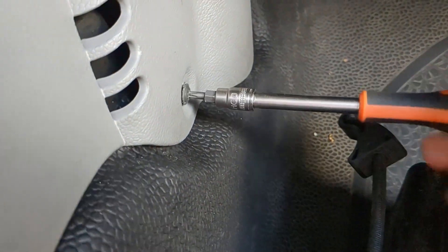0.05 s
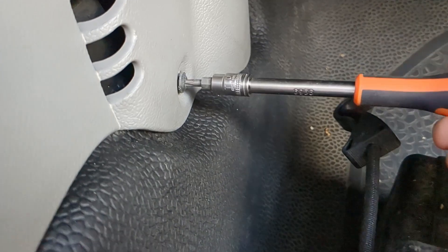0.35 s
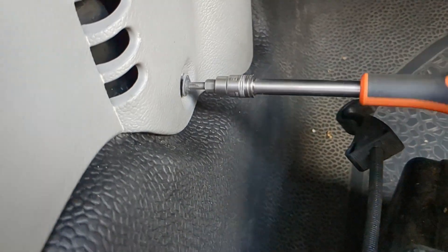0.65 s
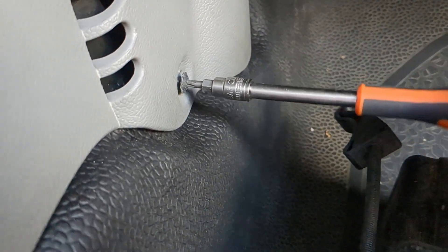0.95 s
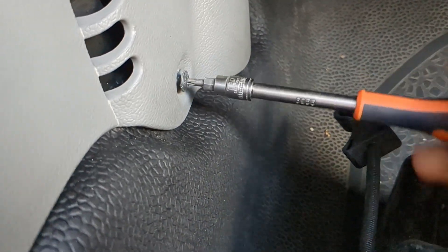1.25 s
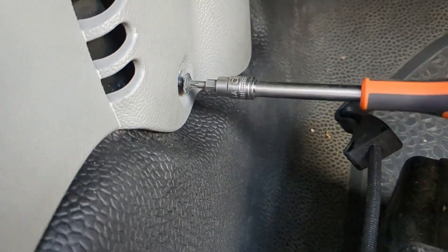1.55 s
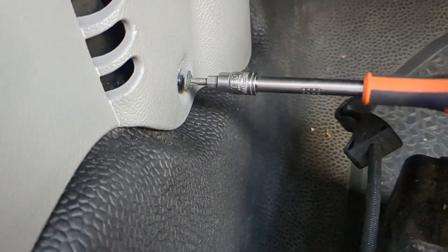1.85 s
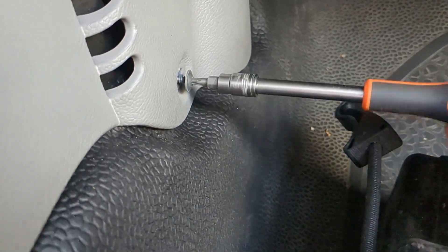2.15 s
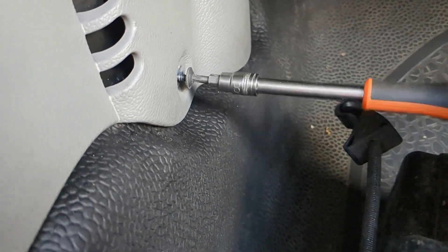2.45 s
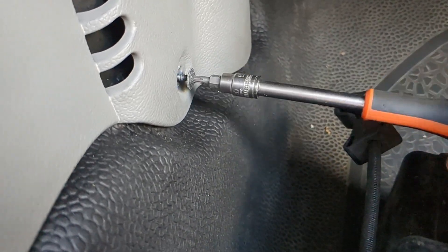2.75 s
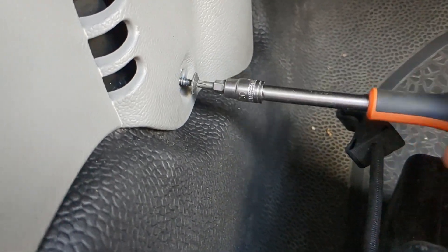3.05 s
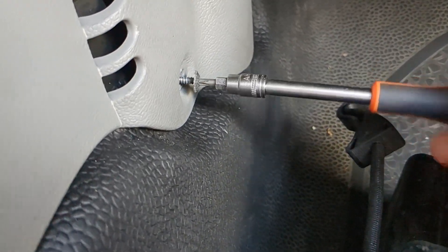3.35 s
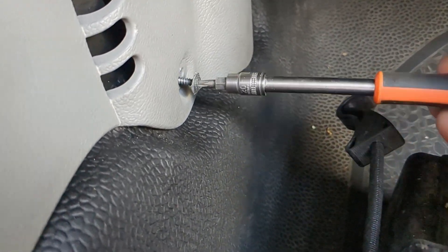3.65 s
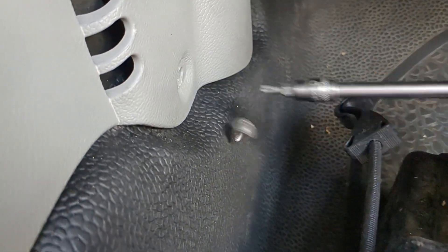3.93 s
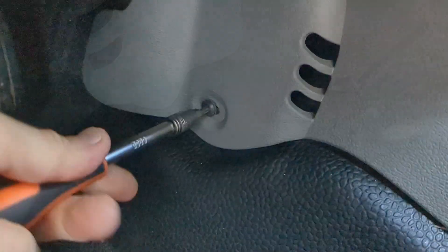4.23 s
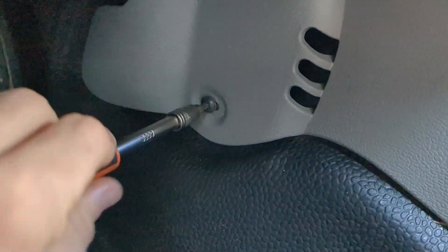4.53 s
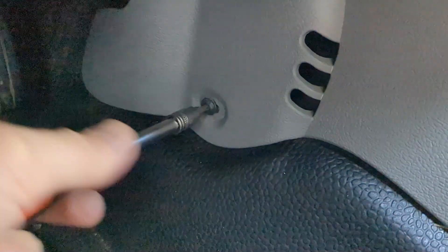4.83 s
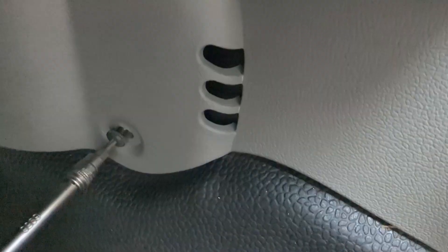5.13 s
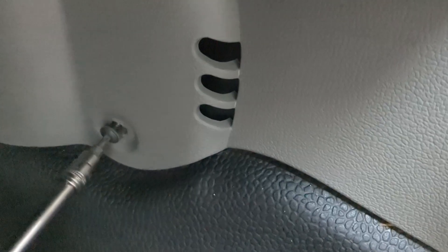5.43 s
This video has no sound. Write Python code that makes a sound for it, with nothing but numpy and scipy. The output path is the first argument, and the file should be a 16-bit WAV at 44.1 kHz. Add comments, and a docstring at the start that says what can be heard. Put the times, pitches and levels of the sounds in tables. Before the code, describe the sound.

Light knocks and rasps of unscrewing a plastic panel inside a car, until the screw falls and bounces loudly over a low rumble.

```python
"""A car's footwell, a stereo pair close to a plastic trim panel, the work off to the left.
A screwdriver backs out a small screw: the bit knocks in the head and bends the panel, the thread
sticks, slips and rasps in the plastic, and fingers hiss round the handle. The screw drops to the floor
and bounces; work goes on more quietly at a second screw, almost straight ahead.
Behind it lie a low cabin rumble, a distant engine pulling away and, at the end, a faint hiss."""
import sys
import numpy as np
from scipy import signal
from scipy.fft import rfft, irfft
from scipy.io import wavfile
from scipy.ndimage import uniform_filter1d

SR = 44100
rng = np.random.default_rng(int(sys.argv[2]) if len(sys.argv) > 2 else 0)


def wav_out(sig):
    """Save sig, one row per channel (or a flat mono array), as 16-bit PCM at SR to the path in sys.argv[1]."""
    wavfile.write(sys.argv[1], SR, np.round(np.clip(np.atleast_2d(sig).T, -1, 1) * 32767).astype(np.int16))


N = 246386
HZ, AGE = np.fft.rfftfreq(8192, 1 / SR), np.arange(8192) / SR  # axes of every response [Hz], [s]

# Levels are relative within each table; spectra give level per hertz.
# rumble in the cabin (frequency [Hz], level [dB])
RUMBLE_SPECTRUM = [(20, -29), (40, -26.5), (60, -1.5), (85, -15.5), (130, -16.5), (250, -31), (400, -29.5),
                   (700, -35), (1050, -45), (7000, -59.5), (16000, -54.5)]
# the distant engine (time [s], pitch [Hz], level [dB])
ENGINE_CURVE = [(4.1, 69.7, -74), (4.3, 74.65, -46), (5.0, 88.9, -54), (5.58, 98.1, -56.5)]
# how long sound lingers in the footwell (frequency [Hz], t60 [s])
CABIN_DECAY = [(100, 0.29), (400, 0.11), (3500, 0.12), (8000, 0.11), (16000, 0.009)]
# the left microphone is the louder (frequency [Hz], left minus right [dB])
MIC_BALANCE = [(150, 3), (380, 7.5), (1300, 6.5), (2400, 9.5), (4400, 3), (15000, 3)]
# twists of the wrist (start [s], length [s], effort [dB], hand hiss [dB], bite of the bit [dB])
TWISTS = [(0.18, 0.14, -52, -66, -36), (0.39, 0.07, -46, -55.5, -44), (0.582, 0.24, -51, -59, -49),
          (0.997, 0.19, -49.5, -59, -43.5), (1.389, 0.16, -50.5, -58.5, -34),
          (1.74, 0.18, -47, -57.5, -38.5), (2.106, 0.15, -46.5, -54.5, -33.5), (2.452, 0.11, -42, -58, -46),
          (2.793, 0.12, -45, -63, -35), (3.107, 0.12, -41.5, -58.5, -61), (3.464, 0.12, -45, -59, -59),
          (3.754, 0.16, -59.5, -80, -59)]
# fingers slide back for a new grip (peak time [s], rise [s], level [dB])
GRIP_SLIDES = [(0.06, 0.085, -61), (0.36, 0.038, -51), (0.94, 0.068, -72), (1.234, 0.022, -68.5),
               (1.311, 0.024, -73), (1.663, 0.071, -56.5), (2.027, 0.075, -57.5), (2.354, 0.087, -58),
               (2.606, 0.014, -65.5), (2.735, 0.036, -68), (3.28, 0.034, -73.5), (3.388, 0.075, -58.5),
               (3.64, 0.034, -68.5), (3.773, 0.027, -64.5), (4.035, 0.046, -71.5), (4.264, 0.078, -63.5),
               (4.35, 0.075, -58), (4.43, 0.073, -69), (4.541, 0.035, -64.5), (4.802, 0.031, -52.5),
               (4.894, 0.065, -56.5), (4.972, 0.023, -64), (5.039, 0.033, -59.5), (5.205, 0.043, -62.5),
               (5.389, 0.025, -59), (5.49, 0.057, -64)]
# skin on the handle (frequency [Hz], level [dB])
SKIN_SPECTRUM = [(300, -16.5), (900, 2), (1500, 3), (3100, 1), (5000, -8.5), (6800, -4), (8000, -9),
                 (10000, 1), (12000, 3.5), (14000, -8), (16000, -0.5)]
# the thread rubbing in its hole (frequency [Hz], level [dB])
THREAD_SPECTRUM = [(60, -9.5), (125, 4), (250, -0.5), (900, 5), (1600, -4), (3200, 2), (7000, 4.5),
                   (15000, -18)]
# rasps of the loosened thread (start [s], peak [s], end [s], level [dB])
RASPS = [(2.47, 2.545, 2.578, -49), (2.805, 2.844, 2.94, -52), (3.125, 3.187, 3.225, -59),
         (3.48, 3.572, 3.592, -54)]
# broad colour of the rasp (frequency [Hz], level [dB])
RASP_SPECTRUM = [(500, -20), (1400, 0), (4800, -2), (7000, -12.5), (10000, -33)]
# resonances of the screw (frequency [Hz], width [Hz], gain [dB])
SCREW_MODES = [(2330, 380, 11), (3210, 570, 13.3), (4520, 210, 8.7), (6530, 610, 14.6)]
# broad response of the trim panel (frequency [Hz], gain [dB])
TRIM_RESPONSE = [(40, -26), (120, 2.5), (260, -9.5), (500, -8), (1000, -1.5), (1700, -8.5), (3000, -12),
                 (5000, -28.5), (7000, -24), (8200, -35), (11000, -21.5), (16000, -46.5)]
# its resonances before the tool damps them (frequency [Hz], width [Hz], gain [dB])
TRIM_MODES = [(121.4, 17, 12.5), (164.7, 38.5, 16.5), (366.7, 44.7, 19.5), (421, 26, 13.5), (645, 86, 6),
              (1336, 190, 3), (1474, 47, 9.5), (2236, 140, 4), (3210, 280, 4), (4190, 150, 9)]
# the band where the second panel hardly radiates (frequency [Hz], width [Hz], gain [dB])
SECOND_TRIM_DIP = [(955, 720, -19)]
# the bit slips in the head (time [s], body level [dB], hardness [dB], metal tick against body [dB])
BIT_SLIPS = [(0.057, -28, 18.5, -15), (0.075, -34.5, 6.5, -28), (0.198, -33, 8, -32.5),
             (0.273, -42.5, -11, -32), (0.361, -27, 6, -25), (0.444, -43.5, -11, -30),
             (0.833, -30.5, 9, -26), (0.87, -40.5, 0.5, -25), (1.017, -40.5, -10, -51),
             (1.176, -36, -0.5, -40), (1.196, -41, 5.5, -34), (1.519, -47, -6, -30),
             (1.586, -36, -1.5, -38), (1.765, -40.5, -6, -48), (1.879, -38, -0.5, -32),
             (2.229, -28, -1, -18.5), (2.293, -32.5, 4.5, -18), (2.52, -35.5, 0, -36),
             (2.551, -36, -2, -35), (2.62, -45, -4, -40), (2.973, -28, -4.5, -41), (3.201, -32, -31, -22),
             (3.567, -51, 5.5, -0.5), (3.669, -43, -11, -44), (3.902, -35, 8.5, -18),
             (3.932, -31, 8.5, -31), (4.314, -39.5, -10, -27), (4.337, -42.5, -15, -25),
             (4.545, -43.5, -14.5, -27), (4.642, -35.5, -2.5, -18), (4.709, -51.5, -5.5, -29.5),
             (4.813, -44.5, -13, -15), (4.867, -41, -8, -36), (4.893, -46.5, -29, -32),
             (4.982, -50, -24, -31), (5.151, -40.5, 6.5, -17.5)]
# the screw lands and bounces (time [s], level [dB], low thud [dB], ring [dB])
BOUNCES = [(4.1092, -8, -9, -11), (4.1144, -17, 6.5, -27), (4.1256, -11, -17.5, -3.5),
           (4.2442, -18, 7, -24), (4.29, -25, 2, -28.5)]
# the crack of a landing (frequency [Hz], level [dB])
LANDING_SPECTRUM = [(40, -27.5), (130, 7), (300, -0.5), (800, 3), (1500, -1), (2200, 0.5), (3300, -6.5),
                    (4400, -21.5), (7500, -30), (12000, -24.5), (16000, -54.5)]
# ring of what the screw strikes (frequency [Hz], level [dB], t60 [s])
FLOOR_RING = [(510, 2, 0.12), (797, -4.5, 0.17), (1170, -6.5, .14), (1258, 3, 0.15), (1340, -7.5, 0.13),
              (1488, -3, 0.11), (1690, -15, 0.13), (2200, -18.5, 0.18), (2410, -12, .17), (2552, -16, 0.19),
              (3540, -17, 0.23)]

SECOND_SCREW_S = 4.3
PITCH_SPREAD = .04  # each contact loads a part differently and shifts its resonances


def amp(db):
    """Decibels to gain."""
    return 10 ** (np.asarray(db) / 20)


def evened(x):
    """Scales to rms 1."""
    return x / np.sqrt(np.mean(x ** 2) + 1e-20)


def read(points, hz=HZ):
    """Reads a spectrum table on a log-frequency axis."""
    f, value = np.transpose(points)
    return np.interp(np.log(hz + 1), np.log(f + 1), value)


def follow(rows, column=1):
    """Reads one column of a curve at every sample."""
    rows = np.array(rows)
    return np.interp(np.arange(N) / SR, rows[:, 0], rows[:, column])


def add(mix, s, sound):
    """Adds a stereo sound at time s."""
    part = mix[:, max(round(s * SR), 0):][:, :sound.shape[1]]
    part += sound[:, :part.shape[1]]


def causal(db):
    """The response of a passive body with this gain: it rings only after the blow."""
    cepstrum = irfft(np.log(amp(db)))
    return np.exp(rfft(cepstrum * (1 + np.sign(np.fft.fftfreq(len(AGE))))))


def ringing(response):
    """The impulse response of a frequency response, faded at its far end."""
    return np.atleast_2d(irfft(response)) * np.minimum(1, 2 - 2 * AGE / AGE[-1])


def through(x, response):
    """Passes a sound through a frequency response."""
    return signal.fftconvolve(x, ringing(response), axes=1)[:, :N]


def resonances_db(modes, pitch=1, damping=1):
    """Gain of a set of resonances, shifted by pitch and widened by damping."""
    peaks = sum((amp(db) - 1) / (1 + (2 * (HZ - hz * pitch) / (width * damping)) ** 2)
                for hz, width, db in modes)
    return 20 * np.log10(np.maximum(1 + peaks, 1e-3))


def sides(lean=1):
    """Gains at the left and right microphones; lean 0 is straight ahead, 1 off to the left."""
    return amp(lean * np.outer([.5, -.5], read(MIC_BALANCE)))


def scatter(t60, wide_hz=450):
    """Dense reflections of energy 1, alike at both microphones in the bass; t60 is a table by frequency."""
    hz, t, noise = signal.stft(rng.standard_normal((2, len(AGE))), SR, nperseg=128)
    apart = (hz ** 2 / (hz ** 2 + wide_hz ** 2))[:, None]
    pair = np.array([noise[0], np.sqrt(1 - apart ** 2) * noise[0] + apart * noise[1]])
    tail = signal.istft(pair * amp(-60 * t / read(t60, hz)[:, None]), SR, nperseg=128)[1]
    onset = 1 - np.exp(-AGE / 0.0014)
    return rfft(evened(tail * onset) / np.sqrt(len(AGE)))


def footwell(near_db, tail_db, near_t60, s=0, lag_s=.00023):
    """Path to the microphones at time s: direct sound, left first, then close walls, then the cabin."""
    lean = 0.2 if s > SECOND_SCREW_S else 1
    direct = np.exp(-2j * np.pi * np.outer([0, round(lean * lag_s * SR) / SR], HZ))
    near = scatter([(300, near_t60), (8000, near_t60 / 2)])
    return sides(lean) * (direct + amp(near_db) * near + amp(tail_db) * scatter(CABIN_DECAY))


def far_hiss(level_db=-72, centre_hz=1700):
    """A faint midrange hiss comes up at the end."""
    hiss = signal.lfilter(*signal.iirpeak(centre_hz, 2, SR), rng.standard_normal((2, N)))
    return amp(level_db) * evened(hiss) * follow([(5.1, 0), (5.3, 1)])


def far_engine():
    """An engine pulls away in the distance: one low, rising tone, the same at both microphones."""
    phase = 2 * np.pi * np.cumsum(follow(ENGINE_CURVE)) / SR
    return amp(follow(ENGINE_CURVE, column=2)) * np.sqrt(2) * np.sin(phase)


def cabin_rumble(level_db=-52, late_bass_db=3, wide_hz=300):
    """Rumble all round; its bass is alike at both microphones and louder at the second screw."""
    common, apart = rng.standard_normal((1, N)), rng.standard_normal((2, N))
    colour, width = causal(read(RUMBLE_SPECTRUM)), HZ / (HZ + wide_hz)
    rumble = evened(through(common, colour * np.sqrt(1 - width ** 2)) + through(apart, colour * width))
    bass = signal.sosfilt(signal.butter(1, wide_hz, fs=SR, output="sos"), rumble)
    swell = amp(follow([(4.1, 0), (4.25, late_bass_db)])) - 1
    return amp(level_db) * (rumble + swell * bass)


def friction(stroke, per_s, spread_db, smooth, judder_db, drift_db=0.5):
    """Tiny slips of uneven size over a smooth rub, under a hand that judders and drifts in pressure."""
    n = len(stroke)
    size = amp(spread_db * np.minimum(rng.exponential(1, n), 4)) * rng.choice([-1, 1], n)
    drive = evened(size * (rng.random(n) < per_s / SR)) + smooth * rng.standard_normal((2, n))
    judder = evened(uniform_filter1d(rng.standard_normal(n), size=300, mode="wrap"))
    drift = evened(uniform_filter1d(rng.standard_normal(n), size=1300, mode="wrap"))
    return evened(drive * amp(judder_db * judder + drift_db * drift)) * stroke


def rub(s, drive, colour_db, band_hz, grip_db=1.6):
    """Friction at the microphones, coloured by what it shakes and by the grip; band_hz sets the gain."""
    path = footwell(near_db=-5, tail_db=-9, near_t60=.03, s=s)
    colour_db = colour_db + grip_db * evened(uniform_filter1d(rng.standard_normal(len(HZ)), size=110))
    inside = (HZ > band_hz[0]) & (HZ < band_hz[1])
    band_gain = np.sqrt(np.mean((amp(colour_db) * inside) ** 2))
    return through(drive, causal(colour_db) * path / band_gain)


def twist(length, rise_s=0.086, fall_s=0.031, ease_db=-10):
    """Torque through one twist: it builds, eases and is let go quickly."""
    t = np.arange(0, length + fall_s / 2, 1 / SR)
    ramp = np.clip(np.minimum(t / rise_s, (t[-1] - t) / fall_s), 0, 1)
    return np.sin(np.pi / 2 * ramp) ** 2 * amp(ease_db * (t / length - .5))


def slide(length, start_db=-16.5, end_db=-41, roundness=1.7):
    """Speed of sliding skin, one length either side of its peak: it gathers slowly and stops fast."""
    u = np.linspace(-1, 1, round(2 * max(length, .01) * SR))
    return amp(np.where(u < 0, start_db * abs(u) ** roundness, end_db * u ** 2))


def fingers(regrip_db=1, twist_dull_db=1, regrip_dull_db=4, dull_hz=5000, lighten_db_per_s=2.37):
    """Skin hisses round the handle at each twist and new grip; its dull rub fades as the grip lightens."""
    out = np.zeros((2, N))
    strokes = []
    for s, length, _, hiss_db, _ in TWISTS:
        torque = twist(length)
        speed = slide(0.73 * length)[:len(torque)]  # peaks late in the twist
        strokes.append((s, speed * np.sqrt(torque), hiss_db, twist_dull_db))
    strokes += [(s - rise, slide(rise), db + regrip_db, regrip_dull_db) for s, rise, db in GRIP_SLIDES]
    for s, stroke, db, dull_db in strokes:
        colour = read(SKIN_SPECTRUM) + (dull_db - lighten_db_per_s * s) / (1 + (HZ / dull_hz) ** 4)
        drive = friction(stroke, per_s=1300, spread_db=4, smooth=.65, judder_db=1.8)
        add(out, s, amp(db) * rub(s, drive, colour, band_hz=(9000, 15000)))
    return out


def panel_db(s, second_pitch=1.124, tool_damping=1.3):
    """Gain of the panel at time s, damped by the pressing tool; the second is higher and hollower."""
    second = s > SECOND_SCREW_S
    pitch = (second_pitch if second else 1) * (1 + PITCH_SPREAD * rng.uniform(-0.97, 1))
    hollow = second * resonances_db(SECOND_TRIM_DIP)
    return read(TRIM_RESPONSE) + resonances_db(TRIM_MODES, pitch, tool_damping) + hollow


def thread(level_db=-4.5, groan_db=-3, groan_hz=190):
    """At each twist the thread sticks and slips in the plastic and shakes the panel."""
    out = np.zeros((2, N))
    for s, length, db, _, _ in TWISTS:
        colour = panel_db(s) + read(THREAD_SPECTRUM) + groan_db / (1 + (HZ / groan_hz) ** 4)
        drive = friction(twist(length), per_s=500, spread_db=3, smooth=.5, judder_db=2.2)
        add(out, s, amp(db + level_db) * rub(s, drive, colour, band_hz=(300, 1000)))
    return out


def rasp():
    """The loose screw grinds in its hole: sharp grains build up, ring the screw and break off."""
    out = np.zeros((2, N))
    for start, peak, end, db in RASPS:
        stroke = np.interp(np.arange(start, end, 1 / SR), [start, peak, end], [0, 1, 0]) ** 2.55
        drive = friction(stroke, per_s=700, spread_db=4, smooth=.25, judder_db=0.5)
        pitch = 1 + PITCH_SPREAD * rng.uniform(-0.86, 1)
        colour = read(RASP_SPECTRUM) + resonances_db(SCREW_MODES, pitch)
        add(out, start, amp(db) * rub(start, drive, colour, band_hz=(2000, 5000)))
    return out


def bending(travel_s):
    """Bending waves in a thin part run slower in the bass; travel_s is their delay at 400 Hz."""
    return np.exp(-4j * np.pi * travel_s * np.sqrt(400 * HZ))


def knock(s, db, hardness_db, tick_db, level_db=-9, soft_travel_s=0.003017, span_s=0.042):
    """Start and sound of a knock on the panel: a click runs down into a thud, fastest when hard."""
    travel_s = soft_travel_s * amp(-max(hardness_db, 0) / 2)
    panel = panel_db(s)
    path = footwell(near_db=1.5, tail_db=-4.5, near_t60=0.032, s=s) * bending(travel_s)
    power = 1.23 * (abs(path * amp(panel)) ** 2).mean(0) / (len(AGE) * span_s * SR)
    bands_hz = [(90, 220), (250, 900), (1000, 4000), (6000, 15000)]
    low, body, middle, high = (10 * np.log10(power[(HZ > lo) & (HZ < hi)].sum()) for lo, hi in bands_hz)
    # a soft contact booms, a hard one clacks and is brighter [dB against the body]
    boom, clack, bright = -7 - 0.26 * hardness_db, -12 + hardness_db, -13.5 + 0.81 * hardness_db
    contact = read([(170, boom - low), (300, -body), (700, -body), (1100, clack - middle),
                    (1700, clack - middle), (3400, bright - middle), (6500, tick_db - high)])
    return s - travel_s / 2, amp(db + level_db) * ringing(path * causal(panel + contact))


def bit_knocks(firm_above_db=-36):
    """The bit bites as each twist starts, with more metal tick when firm, and knocks when it slips."""
    out = np.zeros((2, N))
    for s, _, _, _, bite_db in TWISTS:
        add(out, *knock(s, bite_db, hardness_db=3, tick_db=-25 if bite_db > firm_above_db else -45))
    for slip in BIT_SLIPS:
        add(out, *knock(*slip))
    return out


def falling_screw(level_db=22, thud_hz=600, shadow_db=-5, shadow_hz=1500, clatter_db=-9, clatter_t60=0.25):
    """Sharp landings off to the left: a crack, a thud from the floor mat, a short ring and a clatter."""
    out = np.zeros((2, N))
    shadow = amp(np.outer([0, shadow_db], HZ ** 2 / (HZ ** 2 + shadow_hz ** 2)))  # duller on the right
    for s, db, thud_db, ring_db in BOUNCES:
        colour = read(LANDING_SPECTRUM) + thud_db / (1 + (HZ / thud_hz) ** 2)
        blow = causal(colour) * bending(travel_s=0.00067) * shadow
        clatter = evened(ringing(blow * sides() * scatter([(3500, clatter_t60), (6000, clatter_t60 / 2)])))
        crack = evened(ringing(blow * footwell(near_db=-1.5, tail_db=-9, near_t60=0.019)))
        modes = sum(amp(mode_db - 60 * AGE / t60) * np.sin(2 * np.pi * (hz * AGE + rng.random((2, 1)) / 2))
                    for hz, mode_db, t60 in FLOOR_RING)
        ring = evened(ringing(rfft(modes) * shadow * sides()))
        tail = evened(ring + amp(clatter_db) * clatter)
        add(out, s, amp(db + level_db) * (crack + amp(ring_db) * tail) / np.sqrt(2 * len(AGE)))
    return out


def scene():
    """Tool, screw and hand close by, the cabin and the distance behind them."""
    work = bit_knocks() + falling_screw() + fingers() + thread() + rasp()
    return work + cabin_rumble() + far_engine() + far_hiss()


def record(dry, dip_hz=1010, dip_depth=0.43, dip_q=4.5, ceiling=.92, edge_hz=16000):
    """The microphones have a narrow dip in their colour; peaks clip and the top treble is cut."""
    heard = dry - dip_depth * signal.lfilter(*signal.iirpeak(dip_hz, dip_q, SR), dry)
    lowpass = signal.firwin(255, edge_hz, window=("kaiser", 8), fs=SR)
    return signal.oaconvolve(np.clip(heard, -ceiling, ceiling), lowpass[None], "same")


dry = scene()
out = record(dry)
wav_out(out)
```